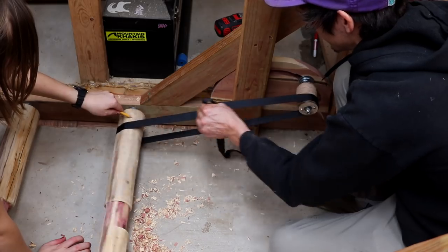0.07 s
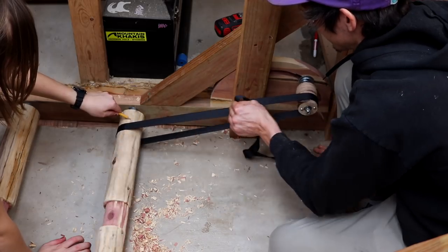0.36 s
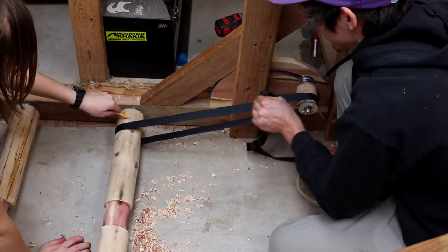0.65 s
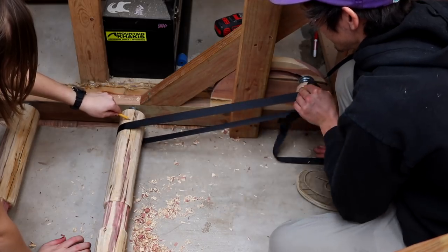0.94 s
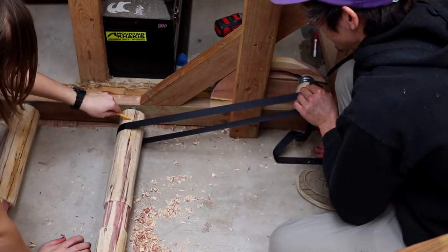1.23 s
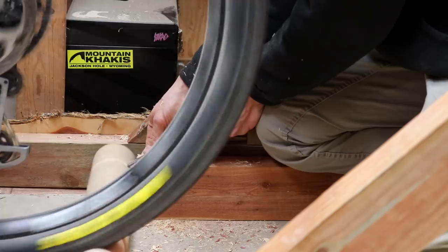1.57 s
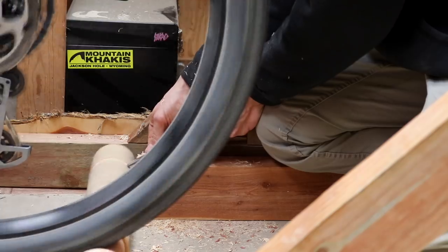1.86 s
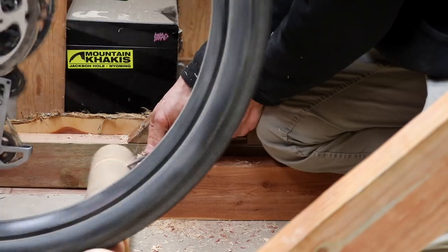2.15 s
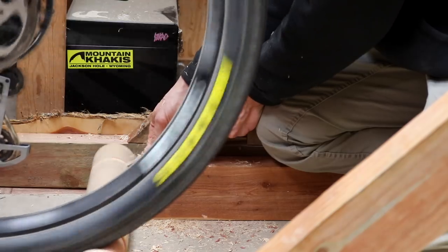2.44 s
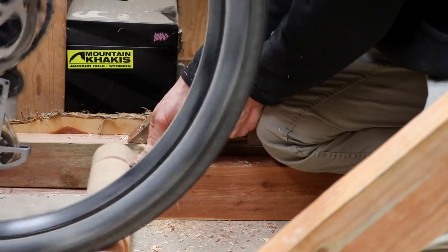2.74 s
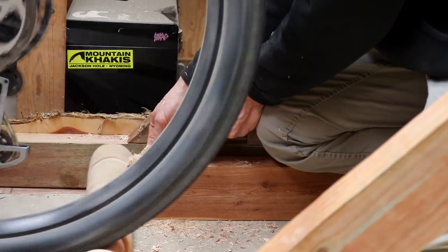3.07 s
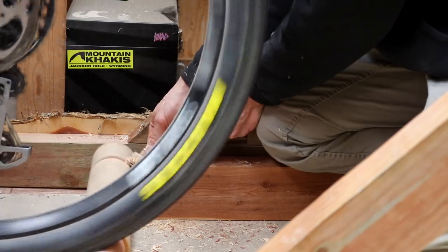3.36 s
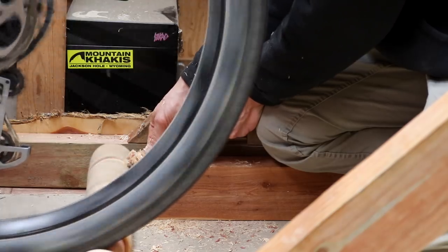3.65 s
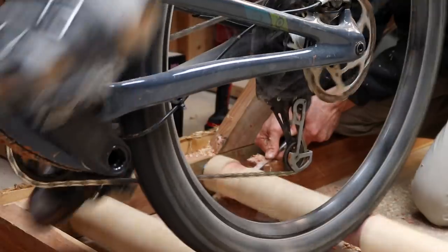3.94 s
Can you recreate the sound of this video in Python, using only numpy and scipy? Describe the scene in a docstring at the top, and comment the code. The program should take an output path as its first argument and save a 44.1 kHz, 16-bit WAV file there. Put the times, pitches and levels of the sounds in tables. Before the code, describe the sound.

A pedal-powered wood lathe starts abruptly after a quiet stretch of strap rubbing and snapping. Its timber rattles and its belt hums in pulses, while a chisel scrapes, squeaks and chatters on the spinning wood, nearby in a small workshop.

```python
"""Small workshop with a pedal-powered wood lathe. A webbing strap is drawn by hand over the wooden
spindle, rubbing and snapping. Then, abruptly, the lathe is running: the timber frame rumbles and the
drive belt hums up and down with the pedal strokes. A chisel meets the spinning wood, squeaks, tears
off a shaving about once a turn and chatters with a steely ring."""
import sys
import numpy as np
from scipy import signal
from scipy.fft import rfft, irfft
from scipy.io import wavfile
from scipy.ndimage import uniform_filter1d

SR = 44100
rng = np.random.default_rng(int(sys.argv[2]) if len(sys.argv) > 2 else 0)


def store_pcm(level_fs):
    """Save levels as 16-bit WAV."""
    pcm = np.round(np.clip(level_fs, -1, 1) * 32767).astype(np.int16)
    wavfile.write(sys.argv[1], SR, np.atleast_2d(pcm).T)


N = 176400
TIME = np.arange(N) / SR
RUN_S, CUT_S, LIFT_S = 1.605, 2.108, 3.965  # lathe running, chisel on, chisel off
TICK_FALL_S = .004

TURN_TICKS = [(1.672, -36.5), (1.741, -37.5), (1.809, -39), (1.881, -36), (1.957, -40), (2.024, -35),
              (2.089, -43), (2.113, -30), (2.276, -32), (2.357, -32), (2.43, -30), (2.499, -36),
              (2.581, -31), (2.667, -30), (2.748, -31), (2.819, -35), (2.89, -35), (3.093, -32),
              (3.176, -31), (3.251, -32), (3.325, -34), (3.42, -31), (3.527, -31), (3.677, -33),
              (3.846, -37), (3.94, -32)]  # about one per spindle turn: t/s, level/dB
TORN_SHAVINGS = [(2.111, .013, -17.5), (2.18, .04, -23), (2.275, .05, -21), (2.35, .035, -23),
                 (2.43, .04, -20), (2.495, .035, -23), (2.578, .05, -24), (2.68, .05, -21),
                 (2.75, .035, -23), (2.825, .03, -27), (2.88, .03, -25), (2.965, .03, -23),
                 (3.01, .025, -26), (3.082, .035, -22), (3.172, .045, -22), (3.245, .035, -24),
                 (3.325, .04, -26), (3.412, .045, -20), (3.52, .04, -21), (3.6, .035, -25),
                 (3.685, .055, -23), (3.75, .035, -23), (3.828, .045, -25), (3.928, .045, -23)]  # mid t/s, length/s, level/dB


def from_db(db):
    """Decibels to gain."""
    return 10 ** (np.asarray(db) / 20)


def rms_one(x):
    """Scale to unit power."""
    return x / np.sqrt(np.mean(x ** 2) + 1e-20)


def noise():
    """White noise, unit power."""
    return rng.standard_normal(N)


def in_time(rows):
    """Interpolate each column after t/s per sample."""
    times_s, *columns = np.transpose(rows)
    return [np.interp(TIME, times_s, column) for column in columns]


def colour(x, spectrum):
    """Shape x by (f/Hz, level/dB) points, rolling off outside them; unit power."""
    hz, db = np.transpose(spectrum)
    log_f = np.log(np.maximum(np.arange(N // 2 + 1) * SR / N, 1))
    outside = np.maximum(np.log(hz[0]) - log_f, 0) + np.maximum(log_f - np.log(hz[-1]), 0)
    gain = from_db(np.interp(log_f, np.log(hz), db) - 20 * outside)
    return rms_one(irfft(rfft(x) * gain, N))


def drift(rate_hz):
    """Smooth random curve, unit spread, clipped at +-2."""
    hz = np.arange(N // 2 + 1) * SR / N
    slow = irfft(rfft(noise()) / (1 + (hz / rate_hz) ** 2), N)
    return np.clip(rms_one(slow), -2, 2)


def grains(per_s, spread_db, smooth):
    """Tiny random impacts of uneven size plus a share of smooth friction."""
    sizes = from_db(spread_db * np.minimum(rng.exponential(1, N), 4)) * rng.choice([-1, 1], N)
    impacts = rms_one(sizes * (rng.random(N) < per_s / SR))
    return rms_one(impacts + smooth * noise())


def resonate(x, modes):
    """Parallel modes (f/Hz, width/Hz, level/dB); white input keeps its power."""
    out, power = 0, 0
    for k, (hz, width_hz, db) in enumerate(modes):
        radius = np.exp(-np.pi * width_hz / SR)
        gain = from_db(db) * np.sqrt((1 - radius ** 2) / 2) * (-1) ** k
        feedback = [1, -2 * radius * np.cos(2 * np.pi * hz / SR), radius ** 2]
        out += signal.lfilter([gain, 0, -gain], feedback, x + 1e-18)
        power += from_db(db) ** 2
    return out / np.sqrt(power)


def blows(rows, fall_s):
    """Envelope of sudden onsets (t/s, level/dB) with exponential decay."""
    return sum(from_db(db) * (TIME >= s) * np.exp(-np.maximum(TIME - s, 0) / fall_s) for s, db in rows)


def steady(x, span_s):
    """Even out swells slower than the span; unit power."""
    return x / np.sqrt(np.maximum(uniform_filter1d(x * x, max(int(span_s * SR), 2)), 1e-9))


def background():
    """Faint low rumble and hiss."""
    spectrum = [(25, -17), (45, 5.5), (85, 6), (220, -16.5), (1400, -19), (2400, -25.5), (15500, -26)]  # f/Hz, level/dB
    return from_db(-54.5) * colour(noise(), spectrum)


def workshop(x, t60_s=.42, tail_db=-14):
    """Add a short, dull, diffuse room tail."""
    t = TIME[:SR // 2]
    dull = signal.lfilter([1], [1, -.6], rng.standard_normal(len(t)))
    tail = dull * from_db(-60 * t / t60_s) * (t > .004)
    return x + from_db(tail_db) * signal.fftconvolve(x, tail / np.sqrt(np.sum(tail ** 2)))[:N]


def clinks(width_hz=50, fall_s=.022):
    """Small metal parts ring briefly under the strap's pull."""
    touches = [(.243, 3650, -55), (.968, 3620, -40), (1.001, 1590, -37.5)]  # t/s, f/Hz, level/dB
    out = 0
    for s, hz, db in touches:
        ring = steady(resonate(noise(), [(hz, width_hz, 0)]), .015)
        out += blows([(s, db)], fall_s) * ring
    return out


def bumps(rise_s=.018, fall_s=.023):
    """The spindle bumps in its bearings: a hollow note with wooden clatter."""
    hits = [(.158, 167, -35.5), (.914, 175, -32), (.946, 275, -33.5)]  # t/s, f/Hz, level/dB
    clatter_spectrum = [(120, -18), (300, -5), (450, 2), (700, -16), (1600, -26), (3000, -45)]  # f/Hz, level/dB
    out = 0
    for s, hz, db in hits:
        age_s = TIME - s
        envelope = np.clip(age_s / rise_s, 0, 1) * np.exp(-np.maximum(age_s - rise_s, 0) / fall_s)
        note = np.sqrt(2) * np.sin(2 * np.pi * hz * age_s)
        clatter = from_db(-1.5) * colour(noise(), clatter_spectrum)
        out += from_db(db) * envelope * (note + clatter)
    return out


def strap():
    """Webbing rubs, rasps and snaps against the rolling spindle."""
    pull = [(0, -44, -51, -49), (.268, -48.5, -45, -39), (.44, -54, -51, -52.5), (.5, -49, -56, -55),
            (.6, -47, -55, -52.5), (.8, -47.5, -42, -41.5), (.914, -43.5, -41, -41),
            (1.01, -51, -43.5, -38.5), (1.05, -52.5, -53, -43.5), (1.24, -63.5, -65.5, -61.5),
            (1.33, -59, -65, -53.5), (1.45, -65, -63, -59.5)]  # t/s, rub/dB, rasp/dB, roll/dB
    rub_spectrum = [(400, -9), (700, -8), (900, -6), (1300, 1.5), (1600, 2), (2100, -.5), (2600, -14),
                    (5000, -38)]  # f/Hz, level/dB
    rasp_spectrum = [(1500, -25), (2300, 0), (2900, 1), (3700, 2), (5300, -2.5), (7000, -9.5), (9500, -14),
                     (12500, -14), (16000, -25)]  # f/Hz, level/dB
    roll_spectrum = [(70, -6), (120, -0.5), (170, -1), (240, 1), (330, -4), (450, -1), (700, -5.5),
                     (1100, -12)]  # f/Hz, level/dB
    snap_hits = [(.119, -34.5), (.158, -46), (.243, -41), (.268, -49), (.784, -49), (.878, -34),
                 (.907, -37), (1.003, -36), (1.319, -51)]  # t/s, level/dB
    snap_spectrum = [(800, -24), (3500, 11), (7000, 5), (12500, -6), (16000, -19)]  # f/Hz, level/dB
    rub_db, rasp_db, roll_db = in_time(pull)
    rub = from_db(rub_db) * colour(grains(3000, spread_db=5, smooth=1), rub_spectrum)
    weave = grains(2500, spread_db=2.5, smooth=.9) * from_db(1.1 * drift(70))
    rasp = from_db(rasp_db) * colour(weave, rasp_spectrum)
    roll = from_db(roll_db - 1.5) * steady(colour(noise(), roll_spectrum), .11)
    snaps = blows(snap_hits, fall_s=.0044) * colour(noise(), snap_spectrum)
    return rub + rasp + roll + snaps


def frame(rattles_per_s=1500):
    """Bearings and tyre rattle the timber; the spectrum shifts as the chisel loads the spindle."""
    rumble = [(1.63, -16.5), (2.05, -16.5), (2.19, -20), (2.27, -17.5), (2.6, -19.5), (3.85, -20.5),
              (4, -18.5)]  # t/s, level/dB
    free_spectrum = [(40, -25), (90, -19), (140, -2), (230, -7), (420, 0), (740, -6.5), (850, -10),
                     (1160, -7), (1900, -18.5), (2450, -16.5), (4700, -29), (5900, -34.5), (11200, -43),
                     (15500, -59)]  # f/Hz, level/dB
    loaded_spectrum = [(40, -32), (80, -20), (130, -9), (180, -2), (240, -10.5), (320, -7), (450, -1),
                       (600, -3), (850, -11), (1020, -10.5), (1150, -7.5), (1400, -18), (1650, -7.5),
                       (2000, -20), (3000, -35), (6000, -42), (15000, -46)]  # f/Hz, level/dB
    timber_modes = [(438, 34, -5), (545, 54, -3), (657.3, 21, -3.5), (754.5, 51, -1.5), (934, 42, -3.5),
                    (1154.6, 32, -4), (1552, 20, -9.5), (1700, 4.7, -17), (1860, 33, -14)]  # f/Hz, width/Hz, level/dB
    level_db, = in_time(rumble)
    rattle = grains(rattles_per_s, spread_db=1, smooth=.45) * from_db(1.23 * drift(41))
    load = np.clip((TIME - CUT_S) / .28, 0, 1)
    free = from_db(-3) * (1 - load) * colour(rattle, free_spectrum)
    loaded = from_db(-7) * load * colour(rattle, loaded_spectrum)
    ring = from_db(-11) * resonate(grains(rattles_per_s, spread_db=5.5, smooth=.27), timber_modes)
    return from_db(level_db) * steady(free + loaded + ring, .051)


def ticks():
    """The spindle ticks lightly as it turns."""
    spectrum = [(3000, -18), (10500, -14), (12300, 0), (14500, 0), (16000, -6)]  # f/Hz, level/dB
    return blows(TURN_TICKS, TICK_FALL_S) * colour(noise(), spectrum)


def knocks():
    """The loose frame knocks dully."""
    hits = [(1.74, -12), (1.932, -17), (2.254, -16), (2.295, -15), (2.843, -23), (3.158, -13.5),
            (3.655, -16.5)]  # t/s, level/dB
    spectrum = [(200, -8), (450, 17), (750, 3), (2500, -24)]  # f/Hz, level/dB
    return blows(hits, fall_s=.014) * steady(colour(noise(), spectrum), .0063)


def belt(wander=.025, octave_db=-17):
    """The taut belt hums and flutters, higher and louder on each pedal stroke."""
    hum = [(1.6, 126, -32), (1.74, 132, -30), (1.81, 150, -34), (1.87, 135, -17), (1.94, 126, -20),
           (2.03, 151, -14), (2.1, 155, -13.5), (2.19, 125, -26), (2.28, 104, -34), (2.38, 128, -28),
           (2.52, 138, -29), (2.65, 101, -30), (2.72, 119, -26), (2.78, 137, -29), (2.88, 133, -20),
           (2.96, 109, -32), (3.06, 82, -42), (3.16, 121, -29), (3.25, 138, -25), (3.33, 131, -25),
           (3.47, 85, -41), (3.62, 133, -26.5), (3.73, 136, -23), (3.86, 100, -36), (3.94, 123, -26),
           (4, 124, -23)]  # t/s, f/Hz, level/dB
    hz, db = in_time(hum)
    phase = 2 * np.pi * np.cumsum(hz * (1 + wander * drift(24.8))) / SR
    flutter = 1 + .3 * drift(22)
    return from_db(db) * flutter * (np.sin(phase) + from_db(octave_db) * np.sin(2 * phase))


def squeaks(base_hz=3680, rise_hz=1800, scatter_hz=90, rough_hz=190):
    """Each bite of the edge gives a stuttering squeak that climbs as it fades."""
    grazes = [(1.664, .009, -29), (1.975, .012, -26)]  # touches before the cut: mid t/s, length/s, level/dB
    bites = grazes + TORN_SHAVINGS
    waver_hz = rough_hz * drift(700)
    stutter = rms_one(from_db(5 * drift(180)))
    out = 0
    for (s, length_s, db), offset in zip(bites, rng.standard_normal(len(bites))):
        progress = np.clip((TIME - s) / length_s + .48, 0, 1)
        hz = base_hz + scatter_hz * offset + rise_hz * progress ** 2 + waver_hz
        envelope = np.interp(progress, [0, .15, .55, .9, 1], [0, 1, .75, .35, 0])
        out += from_db(db - 4.5) * envelope * np.sin(2 * np.pi * np.cumsum(hz) / SR)
    return np.sqrt(2) * stutter * out


def splinters(tearing, count=24, low_hz=6300, high_hz=12600, width_hz=140, tilt_db=-7, fade_db_per_s=2):
    """Snapping fibres ping at many high pitches, loudest at the first bite."""
    snaps = grains(1800, spread_db=2.5, smooth=0)
    pitch_index = rng.integers(0, count, N)
    pitches_hz = np.geomspace(low_hz, high_hz, count) * rng.uniform(.985, 1.015, count)
    pings = 0
    for k, hz in enumerate(pitches_hz):
        pings += from_db(tilt_db * k / count) * resonate(snaps * (pitch_index == k), [(hz, width_hz, 0)])
    fade = from_db(-fade_db_per_s * (TIME - CUT_S))
    return (from_db(-37.5) + from_db(-29.5) * tearing) * fade * rms_one(pings)


def steel_ring(kick_rise_s=.005):
    """The chisel rings as it kicks against its rest and chatters on the wood."""
    kick_hits = [(2.112, -18), (2.135, -14), (2.274, -15), (2.44, -11), (2.577, -11), (2.663, -12),
                 (2.758, -14), (2.891, -14), (2.923, -12), (3.025, -13), (3.067, -11), (3.123, -8),
                 (3.193, -11), (3.249, -14), (3.281, -8), (3.388, -14), (3.415, -12), (3.439, -9),
                 (3.482, -13), (3.525, -8), (3.672, -13), (3.788, -13), (3.816, -12), (3.887, -12),
                 (3.936, -13)]  # t/s, level/dB
    modes = [(2346, 18, -2), (2432, 35, 6.5), (2460, 58, 4.5), (2530, 18, -1), (2647, 16, 0),
             (3380, 26, -15), (3706, 60, -11), (4700, 130, -8.5)]  # f/Hz, width/Hz, level/dB
    envelope = uniform_filter1d(blows(kick_hits, fall_s=.009), int(kick_rise_s * SR))
    kicks = from_db(-.5) * envelope * steady(resonate(noise(), modes), .0079)
    drive = grains(600, spread_db=2, smooth=.16)
    # contact moves along the edge, so the modes take turns to lead
    chatter = sum(from_db(db + 3.5 * drift(22)) * resonate(drive, [(hz, width_hz, 0)])
                  for hz, width_hz, db in modes)
    return kicks + from_db(-24.5) * steady(chatter, .032)


def chisel(attack_s=.001, release_s=.041, tear_lag_s=.0038, fibres_per_s=2600):
    """The edge scrapes, tears off shavings and cracks against the wood's high spot at each tick."""
    tear_spectrum = [(1200, 8), (2600, -6), (3300, -3.5), (3680, 13), (3950, -5), (4280, 11.5), (4450, 3),
                     (4740, 5), (5000, -6), (5900, -5), (6500, -10), (8000, -13), (10500, -11),
                     (13000, -26), (16000, -26)]  # f/Hz, level/dB
    scrape_spectrum = [(1500, 0.5), (2300, 2), (2800, 8), (3300, -0.5), (3680, 0.5), (4000, -2.5),
                       (4750, 3.5), (5100, -6.5), (6000, -11), (6600, -12.5), (8000, -22), (10500, -18),
                       (13000, -33), (16000, -37)]  # f/Hz, level/dB
    crack_spectrum = [(2500, -9), (5500, 3), (7000, -7), (11000, -7), (15000, -24)]  # f/Hz, level/dB
    contact = np.clip((TIME - CUT_S) / attack_s, 0, 1) * np.clip(1 - (TIME - LIFT_S) / release_s, 0, 1)
    tearing = sum(from_db(db) * np.exp(-2 * ((TIME - s - tear_lag_s) / length_s) ** 2)
                  for s, length_s, db in TORN_SHAVINGS)
    fibres = grains(fibres_per_s, spread_db=2.5, smooth=.24) * from_db(3.6 * drift(100))
    tear = from_db(-4.5) * tearing * colour(fibres, tear_spectrum)
    friction = grains(fibres_per_s, spread_db=2.5, smooth=.39) * from_db(4.5 * drift(73))
    scrape = from_db(-25.5) * colour(friction, scrape_spectrum)
    ringing = steel_ring() + splinters(tearing)
    cracks = from_db(7) * blows(TURN_TICKS, TICK_FALL_S) * colour(noise(), crack_spectrum)
    return contact * (tear + scrape + ringing + cracks)


def scene():
    """Quiet strap handling, then the running lathe; mono."""
    floor = background()
    running = workshop(frame() + ticks() + knocks() + chisel() + squeaks()) + belt()
    handling = workshop(strap() + bumps() + clinks())
    return (floor + np.where(TIME >= RUN_S, running, handling))[None]


def record(dry, ceiling=.9, stopband_hz=16400):
    """Soft clip, then steep low-pass."""
    lowpass = signal.cheby2(16, 60, stopband_hz, fs=SR, output="sos")
    return signal.sosfilt(lowpass, ceiling * np.tanh(dry / ceiling))


dry = scene()
out = record(dry)
store_pcm(out)
```